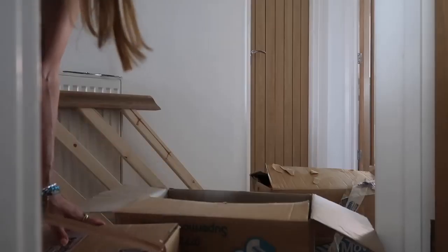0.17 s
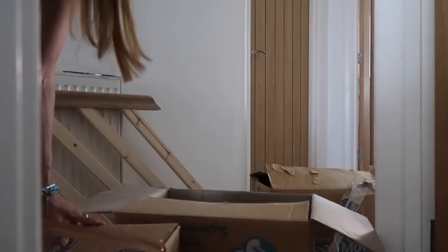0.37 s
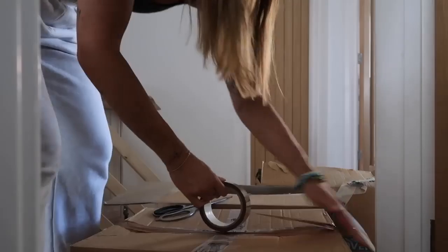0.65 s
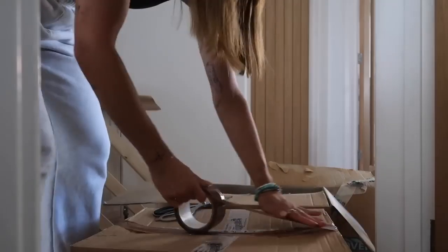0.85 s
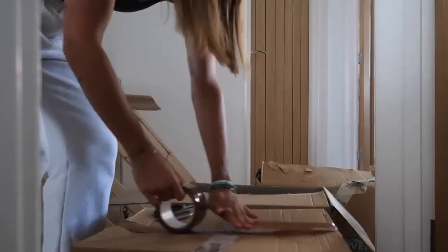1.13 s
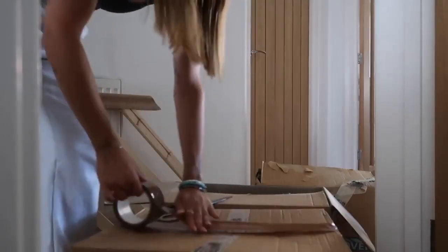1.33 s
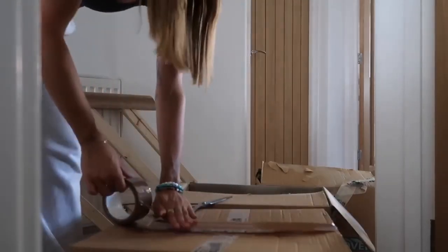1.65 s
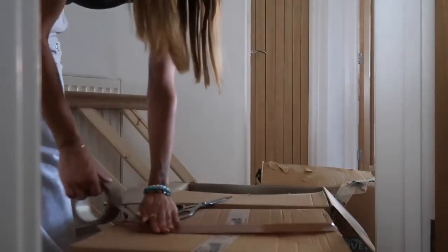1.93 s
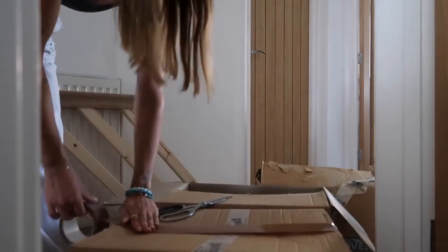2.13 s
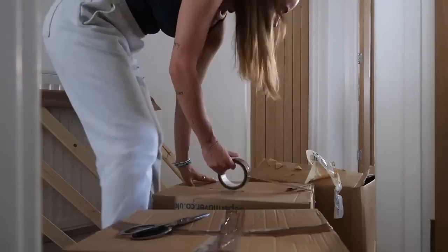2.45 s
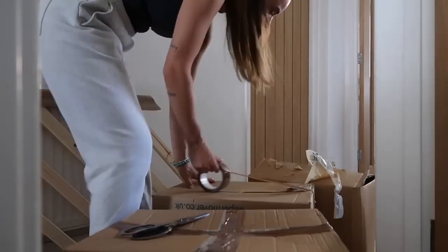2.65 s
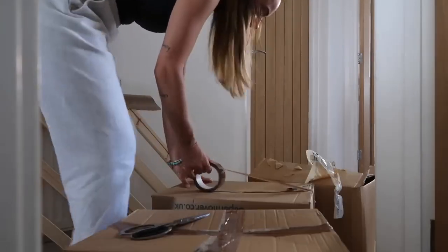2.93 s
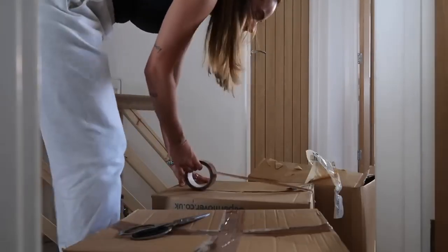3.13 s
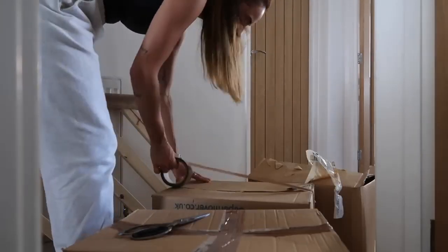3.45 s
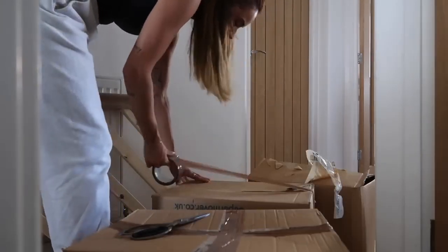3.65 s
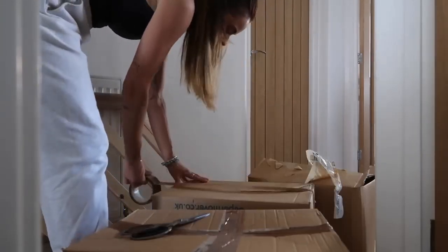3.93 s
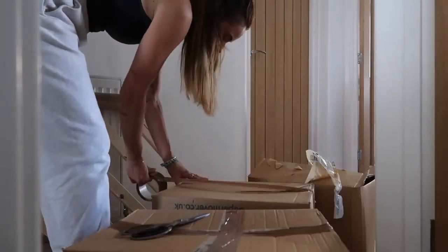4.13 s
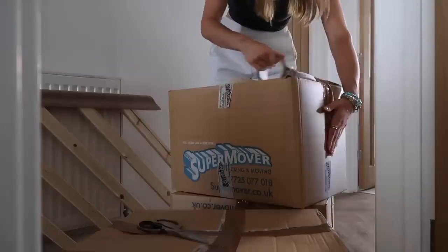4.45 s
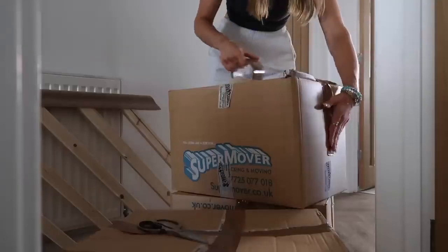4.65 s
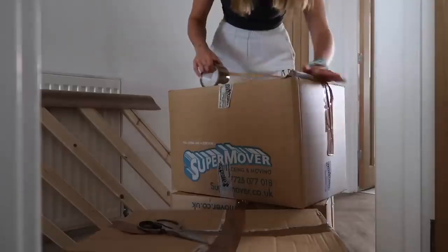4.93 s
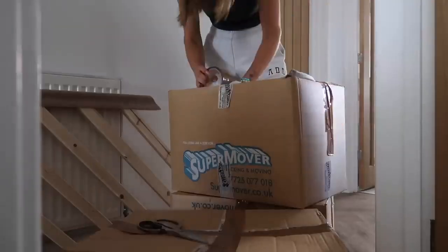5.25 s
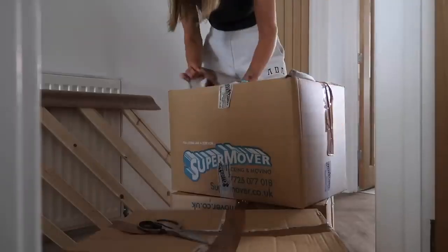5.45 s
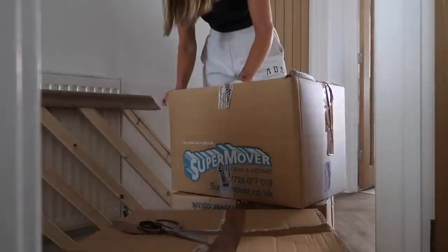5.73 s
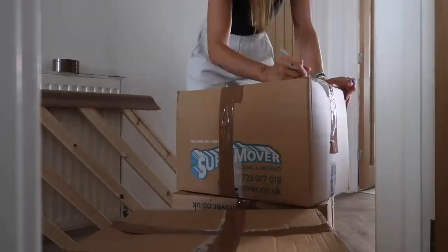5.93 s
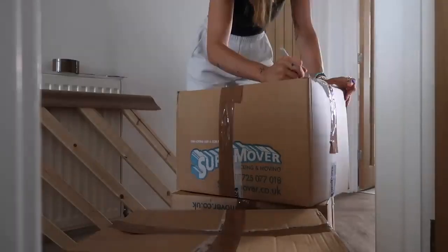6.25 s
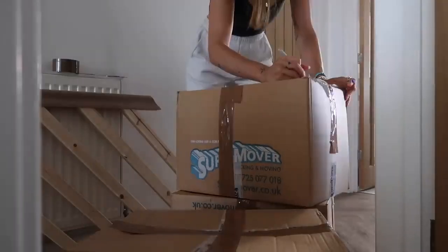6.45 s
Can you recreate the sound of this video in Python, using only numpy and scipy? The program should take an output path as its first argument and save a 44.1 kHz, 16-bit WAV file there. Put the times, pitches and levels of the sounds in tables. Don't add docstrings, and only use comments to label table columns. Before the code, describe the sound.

Close up in a bare, echoing hallway, packing tape tears off its roll in rough, uneven rasps. Sharp snaps and short squealing twangs stand out, and hollow cardboard resonates underneath. The pulls come in groups with abrupt cuts between boxes and small rustles of hands. A last fast ripping burst ends, leaving faint rubs and taps on cardboard over a very soft room hush.

```python
import sys
import numpy as np
from scipy import signal
from scipy.fft import rfft, irfft
from scipy.io import wavfile
from scipy.ndimage import uniform_filter1d

SR = 44100
rng = np.random.default_rng(int(sys.argv[2]) if len(sys.argv) > 2 else 0)


def file_out(sig):
    cols = np.atleast_2d(sig).T
    lim = np.clip(cols, -1, 1)
    pcm = np.round(lim * 32767).astype(np.int16)
    wavfile.write(sys.argv[1], SR, pcm)


def voltage_ratio(decibels):
    exponent = np.asarray(decibels, float) / 20
    return 10 ** exponent


N = 290178

RELEASE_S = 0.05
BOX_AIR_HZ = 90.9

GRIP_STARTS = [
    .7,
    2.455,
    4.275,
    5.3,
]
TAPE_FACING = [-1, 1, -1, -1, 1]
# first_tug_s, slips_per_s, slip_drift_per_s2, panel_hz, panel_drift_hz_per_s
GRIP_MOTION = [
    (0.0, 192, 119.5, 388, 1),
    (.853, 249, -60.5, 320, 137),
    (2.641, 190, -50, 360, 108),
    (4.428, 180, 15, 577, -82),
    (5.378, 156, 450.5, 550, 100),
]
# box_air_over_panel_db, fizz_over_rasp_db, panel_into_hall_db (added to
GRIP_LEVELS = [(-22, -10, -1.5), (-24.5, -10, -4.5), (-13.5, -10, 0), (-16.5, -13.5, 0), (-39, -12.5, 0)]
# start_s, hold_s, first_effort_db, last_effort_db, panel_over_rasp_db
PULLS = [(0.0, 0.17, -21, -24, -7), (0.2, 0.38, -20, -22.5, -8.5), (0.85, 0.09, -15, -19.5, 0),
         (0.968, 0.0075, -23, -29, 3), (1.106, 0.029, -16.5, -18.5, -2),
         (1.177, 0.016, -20, -15.5, 0.5), (1.227, 0.12, -19, -17.5, -2.5),
         (1.346, 0.078, -20, -16.5, 0.5), (1.466, 0.018, -16.5, -19, 0),
         (1.5318, 0.017, -20, -21, 4.5), (1.583, 0.0035, -11.5, -27, 5.5),
         (1.776, 0.0076, -13, -21.5, 1.5), (1.8118, 0.039, -20, -20, 5.5),
         (1.901, 0.018, -14, -28.5, 6.5), (1.9491, 0.15, -18.5, -18.5, -1.5),
         (2.085, 0.024, -20, -21.5, -15),
         (2.6409, 0.16, -15, -19.5, -8), (3.012, 0.039, -20, -17, -9), (3.088, 0.058, -21, -18.5, -7),
               (3.318, .18, -15.5, -20, -6.5), (3.554, 0.04, -21.5, -25.5, -10.5),
               (3.661, 0.043, -23, -26, -7.5), (3.7246, 0.059, -21.5, -20, -5),
               (3.811, 0.055, -21.5, -22, -6.5), (3.881, 0.1, -19, -24.5, -7),
               (3.957, 0.055, -24, -23, -3.5), (4.022, 0.066, -28.5, -28, -1.5),
               (4.426, 0.068, -12, -19, -13.5), (4.498, .11, -15.5, -19, -15.5),
               (4.623, 0.096, -21, -22.5, -2), (4.737, 0.2, -22, -22, -3.5),
               (4.945, 0.11, -22.5, -25.5, -2.5), (5.378, 0.027, -17.5, -19.5, -8),
               (5.428, 0.1, -21.5, -15, -9.5), (5.524, 0.23, -16, -20, -7.5)]


def pull(start, hold, first_effort_db, last_effort_db, panel_db):
    t = np.arange(start, start + hold + RELEASE_S + 0.036, 1 / SR)
    grip = np.searchsorted(GRIP_STARTS, start)
    face = TAPE_FACING[grip]
    air_db, fizz_db, panel_far_db = GRIP_LEVELS[grip]
    since, rate, rate_drift, panel_hz, panel_drift = GRIP_MOTION[grip]
    rate = rate + rate_drift * (t - since)
    panel_hz = panel_hz + panel_drift * (t - since)
    effort_db = hand_effort(t, start, hold, first_effort_db, last_effort_db)
    full_db = max(first_effort_db, last_effort_db)
    weaker_db = np.minimum(effort_db - full_db, 0)

    wander, tear, size = rng.standard_normal((len(t), 3)).T
    slips, common, dip = make_room(t, slip_train(rate, wander, size), full_db)
    puffs = tearing_puffs(slips, tear, size)
    live = t <= start + hold + RELEASE_S
    drive = (0.31 * face * evened(slips) + 0.69 * puffs) * live
    air, panel, tape, _ = bands(coloured(drive, body(grip)), [170, 800, 5500])
    fizz = bands(coloured((0.11 * drive + puffs) * live, body(grip)), [5500])[1]

    close = voltage_ratio(panel_db - 16.5) * panel + ringing_tape_and_panels(t, start, start + hold, tape + panel)
    close = close + face * bare_clicks(common * (t > start), rate, grip) * live
    panel = evened(0.915 * panel + 0.085 * resonate(panel, panel_hz, 150.0))
    air = evened(0.72 * air + 0.28 * resonate(air, BOX_AIR_HZ + 0 * t, 16.0))
    rasp = voltage_ratio(effort_db) * tape
    rasp = rasp + voltage_ratio(full_db + panel_db + panel_far_db + weaker_db) * panel
    rasp = rasp + voltage_ratio(full_db + air_db + panel_db + weaker_db) * air
    fizz_swell = np.minimum(0.49 + (t - start) / 0.057, 1)
    rasp = rasp + voltage_ratio(full_db + fizz_db + 0.85 * weaker_db) * fizz * fizz_swell
    fade_out = np.clip((t[-1] - t) / 0.022, 0, 1)
    return start, np.array([rasp, voltage_ratio(effort_db) * close]) * dip * fade_out


def hand_effort(t, start, hold, first_db, last_db):
    held_db = np.interp(t, [start, start + hold], [first_db, last_db])
    release_db = -420 * np.clip(t - start - hold, 0, RELEASE_S)
    jerk_db = 4.0 * np.exp(-(t - start) / 0.004)
    return held_db + release_db + jerk_db


def slip_train(rate, wander, size, jitter=0.35, spread_db=3.0):
    unevenness = np.exp(jitter * evened(uniform_filter1d(wander, 120)))
    turns = np.cumsum(np.clip(rate, 60, 1500) * unevenness) / SR
    slips = np.diff(np.floor(turns), prepend=-1) * voltage_ratio(spread_db * size)
    slips[0] = 1
    return slips


def make_room(t, slips, full_db):
    common, dip = slips.copy(), np.ones(len(t))
    for at, db, _ in HARD_SLIPS:
        if not t[0] - 0.003 < at < t[-1]:
            continue
        dip *= 1 - 0.85 * np.exp(-0.5 * ((t - at) / 0.00025) ** 2)
        near = abs(t - at) < 0.0025
        slips[near], common[near] = 0, 0
        slips[abs(t - at + 3 / SR) < 0.5 / SR] = voltage_ratio(db - 8 - full_db)
    return slips, common, dip


def tearing_puffs(slips, tear, size, tear_s=0.0058):
    clumps = voltage_ratio(0.93 * evened(uniform_filter1d(size, 500)))
    dying = signal.lfilter([1], [1, -np.exp(-1 / (tear_s * SR))], slips)
    return evened(clumps * (1.2 + dying) * tear)


# start_s, length_s, pitch_hz, level_over_rasp_db
TWANGS = [(0.218, 0.29, 1980, -14), (0.366, 0.29, 3660, -6), (0.854, 0.057, 2060, -2.5),
          (0.855, 0.15, 1120, -2), (0.865, 0.13, 280, -7.5), (1.813, 0.031, 2000, -4),
          (1.949, 0.068, 2240, -5), (2.048, 0.17, 3000, -1.5), (2.057, 0.1, 1850, -8),
          (1.777, 0.01, 2030, 3), (1.773, 0.0092, 1180, -7), (3.334, 0.093, 294, -9.5),
          (3.023, 0.028, 1540, -8), (2.646, 0.05, 2020, -14), (0.0, 0.16, 2540, -4), (0.912, 0.036, 336, 1),
          (1.271, 0.14, 292, -6.5), (1.278, 0.063, 970, -7.5), (1.324, 0.044, 1870, -19),
          (1.535, 0.046, 575, -6), (2.756, 0.038, 3330, -11), (2.78, 0.029, 980, -4.5),
          (3.325, 0.15, 1540, -11), (4.622, 0.17, 1250, -8), (4.979, 0.049, 2350, -3),
          (5.449, 0.068, 4500, -4.5), (5.56, 0.084, 3070, -10), (2.641, 0.095, 1560, -6.5),
          (2.642, 0.087, 310, -4), (3.104, 0.032, 960, 0), (3.323, 0.13, 896, -3.5),
          (3.725, 0.035, 1000, -1), (3.747, .034, 2320, -8), (3.81, 0.052, 2090, -2.5),
          (3.82, 0.037, 845, -5), (3.896, 0.071, 2350, -3), (3.956, 0.091, 840, -10),
          (3.97, 0.13, 1800, -4), (4.427, 0.052, 1930, -9), (4.431, 0.068, 540, -2),
          (4.467, 0.018, 2420, 3), (4.486, 0.06, 1070, -1.5), (4.547, 0.061, 563, -3),
          (4.631, 0.031, 1860, 5.5), (5.499, 0.043, 3000, -10), (5.433, 0.057, 560, -12),
          (5.536, 0.046, 570, -15), (5.66, 0.022, 2400, -4), (5.68, 0.039, 1930, -7),
          (5.68, 0.042, 3100, -8), (5.608, 0.031, 574, -9), (5.6, .035, 2700, -16), (2.039, 0.066, 777, -4),
          (5.684, 0.047, 585, -5),
          (5.435, 0.05, 564, -7.5), (5.538, 0.044, 576, -10), (5.599, 0.033, 574, -5),
               (5.6, .035, 2700, -12), (5.662, 0.02, 2400, -5), (5.676, 0.065, 590, -9),
               (5.688, .045, 1900, -8), (5.693, .045, 3100, -10)]


def ringing_tape_and_panels(t, start, end, shaking):
    sung = 0
    for onset, length, hz, db in TWANGS:
        if onset < end and onset + length > start:
            swell = np.clip(np.minimum(t - onset, onset + length - t) / 0.0046, 0, 1)
            width_hz = 86 * (hz / 1000) ** 1.4
            sung = sung + voltage_ratio(db) * swell * steadied(resonate(shaking, hz + 0 * t, width_hz))
    return sung


CLICK_LEVELS = [-6, -12, -11, -13, -8]


def bare_clicks(slips, rate, grip):
    pulse = np.exp(-0.5 * (np.arange(-6, 7) / 2.2) ** 2)
    pulses = np.convolve(slips, pulse)[4:len(slips) + 4]
    clicks = signal.lfilter([1, -1], [1, -0.89], pulses)
    return voltage_ratio(CLICK_LEVELS[grip]) * evened(clicks) * (220 / rate) ** 0.22


# pitch_hz, level_db
BOX_COLOURS = [
    [(24, -37), (40, -1), (204, 1), (467, -3), (1680, -18.5), (2000, -11), (9500, -29.5), (11000, -32),
     (14500, -46)],
    [(24, -67), (40, -12), (85, -1), (130, -5), (320, -10.5), (479, -10), (2100, -2), (12100, -21.5),
     (16000, -28.5)],
    [(24, -48), (40, -2), (81, -7), (159, -8), (290, -2), (491, -7), (852, 0), (1090, -4), (3140, -5.5),
     (12800, -21), (16000, -30)],
    [(24, -78), (40, -57), (85, -6), (180, -16), (630, -6.5), (918, -12), (1090, -6.5), (12800, -20.5),
     (16000, -25)],
    [(24, -45), (40, -56), (283, -14), (320, -12), (570, -5.5), (873, -10), (2440, -8), (12800, -21.5),
     (16000, -28)],
]
# pitch_hz, width_hz, level_db
BOX_RINGS = [
    [(1980, 55, -13), (2350, 70, -37), (3200, 160, -4)],
    [(324, 13, 11), (1070, 79, -6), (2060, 11, -34)],
    [(320, 130, -27)],
    [(660, 70, -12)],
    [(553, 120, -3), (1860, 66, -8), (2670, 46, -41)],
]


def body(grip, ring_db=6.5):
    def gain_at(hz):
        ring = 0
        for f, width, db in BOX_RINGS[grip]:
            ring = ring + voltage_ratio(0.35 * db) / (1 + (2 * (hz - f) / width) ** 2)
        return voltage_ratio(read(BOX_COLOURS[grip], hz) + ring_db * ring)
    return gain_at


# time_s, peak_db,
# tape_face [+1 or -1]
SNAPS = [(0.0036, -8, -1), (0.0148, -7, -1), (0.0792, -8, -1), (0.1033, -9, 1), (0.1692, -11, 1),
         (0.2036, -9, -1), (0.2132, -6, -1), (0.2179, -6, -1), (0.2386, -6, -1), (0.2452, -6, -1),
         (0.2547, -7, -1), (0.2617, -9, -1), (0.2756, -9, -1), (0.28, -9, -1), (0.2902, -9, -1),
         (0.2947, -8, -1), (0.3376, -7, -1), (0.352, -5, -1), (0.3637, -8, -1), (0.3755, -6, -1),
         (0.3806, -6, -1), (0.3861, -6, -1), (0.4204, -5, -1), (0.4253, -6, -1), (0.4377, -7, -1),
         (0.4573, -7, -1), (0.4661, -4, -1), (0.4702, -4, -1), (0.5407, -8, -1), (0.5515, -9, -1),
         (0.578, -10, -1), (0.9092, -3, 1), (0.9371, -3, 1), (0.9395, -3, -1), (0.9697, -8, -1),
         (1.242, -6, 1), (1.3022, -6, 1), (1.4906, -7, 1), (1.5318, -9, -1), (1.585, -9, -1),
         (1.7766, -4, -1), (1.7793, -6, 1), (1.8124, -6, 1), (1.9018, -7, -1), (1.951, -3, 1),
         (1.959, -4, -1), (1.9776, -5, -1), (2.0212, -6, 1), (2.0917, -4, -1), (2.1171, -5, 1),
         (2.6627, -3, -1), (2.6807, -3, 1), (2.6995, -4, -1), (2.7922, -5, 1), (3.0128, -7, -1),
               (3.0262, -6, 1), (3.0925, -9, -1), (3.0986, -7, -1), (3.3187, -6, -1), (3.3351, -4, -1),
               (3.3421, -4, -1), (3.4308, -4, -1), (3.4461, -4, -1), (3.455, -4, 1), (3.46, -4, 1),
               (3.6774, -12, -1), (3.7246, -10, -1), (3.7398, -6, -1), (3.7497, -4, -1), (3.7599, -4, -1),
               (3.8115, -7, -1), (3.8803, -10, 1), (3.8933, -7, -1), (3.9652, -7, -1), (4.0204, -9, -1),
               (4.0326, -4, -1), (4.0463, -5, -1), (4.4281, -6, -1), (4.4559, -3, -1), (4.4615, -3, -1),
               (4.7385, -8, -1), (4.7434, -8, -1), (4.7842, -7, 1), (4.9627, -10, -1), (5.3816, -7, 1),
               (5.3854, -5, 1), (5.3906, -4, 1), (5.3979, -7, 1), (5.4026, -6, 1), (5.4339, -2, 1),
               (5.4479, -5, 1), (5.4516, -3, 1), (5.4552, -4, 1), (5.4588, -3, 1), (5.4665, -5, 1),
               (5.4701, -5, 1), (5.5246, -4, -1), (5.5496, -3, 1), (5.5567, -4, 1), (5.6994, -4, -1),
         (1.1088, -10, -1), (1.2271, -10, -1), (1.2888, -7, 1), (1.313, -7, -1), (1.8244, -5, -1),
                (1.8402, -6, -1), (1.8487, -6, -1), (2.6412, -9, -1), (2.7101, -4, 1), (2.7726, -7, -1),
                (2.8252, -13, 1), (3.0191, -8, -1), (3.1029, -7, -1), (3.1388, -8, 1), (3.1813, -15, -1),
                (3.3997, -7, -1), (3.4772, -8, -1), (3.4838, -8, -1), (3.4888, -9, -1), (3.5046, -11, 1),
                (3.5559, -14, 1), (3.5752, -12, 1), (3.5859, -12, -1), (3.6627, -14, -1), (3.688, -16, -1),
                (3.8425, -7, -1), (3.9174, -8, 1), (3.9332, -10, -1), (3.9775, -8, -1), (4.0572, -10, 1),
                (4.6635, -6, 1), (4.7125, -10, 1), (4.7555, -10, 1), (4.9493, -12, 1), (4.9953, -10, -1),
                (5.0365, -13, 1), (5.4804, -7, 1), (5.5831, -7, 1), (5.7627, -14, 1)]
HARD_SLIPS = SNAPS
SNAP_RINGS = [-14, -8, -8, -10, -24]


def snap(at, db, face, ring_hz=2070.0, ring_s=0.0016):
    n = np.arange(-8, 300)
    ring_db = SNAP_RINGS[np.searchsorted(GRIP_STARTS, at)]
    hz = ring_hz * rng.uniform(0.733, 1.273)
    ring = voltage_ratio(ring_db) * np.cos(2 * np.pi * hz * n / SR) * np.exp(-n / SR / ring_s) * (n > 10)
    pulse = np.exp(-0.5 * (n / 2.2) ** 2)
    rebound = -0.4 * np.exp(-0.5 * ((n - 6.5) / 2.2) ** 2)
    return max(at - 8 / SR, 0), np.sign(face) * voltage_ratio(db + 1.2) * (pulse + rebound + ring)


# middle_s, length_s, peak_db
BOOMS = [(0.03, 0.057, -26), (0.208, .08, -32), (0.877, .06, -32), (0.995, 0.089, -31.5),
         (1.184, 0.068, -32), (1.425, .08, -29), (1.511, .12, -29), (1.615, .09, -34), (1.79, 0.029, -26),
         (1.849, 0.05, -15.5), (1.943, 0.065, -20.5), (2.037, 0.071, -27), (2.653, 0.063, -33),
         (2.813, .1, -29), (3.034, .09, -32), (3.147, .1, -27), (3.396, 0.21, -21), (3.604, 0.118, -32),
         (3.782, 0.09, -21), (3.922, .1, -28), (4.069, 0.18, -32), (4.807, 0.073, -35), (4.909, .09, -31),
         (5.033, 0.24, -26), (5.418, .09, -31.5), (5.768, 0.086, -39), (6.144, 0.078, -46)]


def boom(middle, length, db, spread=0.048):
    t = np.arange(0, length, 1 / SR)
    detune, phase = rng.uniform(-1, 1, 2)
    tone = np.sin(2 * np.pi * BOX_AIR_HZ * (1 + spread * detune) * t + np.pi * phase)
    return max(middle - length / 2, 0), voltage_ratio(db) * tone * np.sin(np.pi * t / length) ** 2


# start_s, length_s, first_rustle_db, last_rustle_db, low_rub_over_rustle_db
HAND_STROKES = [(0.769, 0.027, -43, -54, -14), (0.797, 0.044, -38.5, -42, 2), (2.476, 0.068, -47, -56, 7),
                (2.523, 0.14, -59, -39, -15), (4.275, 0.064, -38, -43.5, -7), (4.353, 0.07, -42, -43, -7),
                (5.272, 0.1, -34, -37, -10.5), (5.347, 0.03, -35, -44, -10), (6.026, 0.047, -42.5, -36, -5),
                (6.07, 0.097, -35, -41.5, -3), (6.174, 0.21, -84, -66, 17),
                (6.345, 0.057, -50.5, -43.5, -12), (6.398, 0.061, -44, -42, -12),
                (6.466, 0.056, -44, -39.5, -2), (6.522, 0.022, -44, -57, -7), (6.55, 0.029, -50, -37, -8)]
# pitch_hz, level_db
RUB_COLOUR = [(24, -21), (40, 12), (237, -1.5), (312, -8), (354, -1), (433, -12.5), (1150, -27.5),
              (2700, -24), (13100, -44), (16000, -46)]


def hands(start, length, first_db, last_db, low_db, grain_db=6.5, grains_per_s=1500):
    t = np.arange(0, length, 1 / SR)
    grains = (rng.random(len(t)) < grains_per_s / SR) * voltage_ratio(grain_db * rng.exponential(1, len(t)))
    drive = (4.0 + evened(grains)) * rng.standard_normal(len(t))
    low, rustle = bands(coloured(drive, lambda hz: voltage_ratio(read(RUB_COLOUR, hz))), [700])
    level_db = first_db + (last_db - first_db) * t / length
    stroke = voltage_ratio(level_db) * signal.windows.tukey(len(t), 0.04)
    return start, stroke * (rustle + voltage_ratio(low_db) * low)


# time_s, peak_db, pitch_hz
FINGER_TICKS = [(0.771, -42, 2500), (0.797, -30.5, 280), (.798, -36, 2200), (2.462, -39, 3420),
                (2.463, -43, 4800), (2.463, -43, 1900), (2.476, -34, 125), (2.48, -34, 247),
                (2.492, -37, 230), (2.579, -36, 1700), (4.376, -30, 2300), (5.279, -27, 2000),
                (5.287, -25, 1500), (5.324, -24, 4800), (5.33, -30, 3500), (6.023, -39, 1140),
                (6.067, -31, 239), (6.088, -36, 340), (6.104, -36, 260), (6.122, -33, 226), (6.14, -40, 66),
                (6.143, -36, 370), (6.144, -37, 600), (6.16, -40, 70), (6.313, -39, 209), (6.47, -42, 160),
                (6.501, -44, 98)]


def tick(at, db, hz, crack=0.073):
    t = np.arange(2000) / SR
    cycles = 4.9 if hz > 700 else 1.8
    ring = np.sin(2 * np.pi * hz * t) * np.exp(-t * hz / cycles)
    crackle = crack * rng.standard_normal(len(t)) * np.exp(-t / 0.0006)
    return at, voltage_ratio(db + 4.5) * (ring + crackle)


# pitch_hz, time_to_fall_60_db_s
HALL_RING = [(100, 0.35), (260, 0.62), (700, 0.51), (1840, 0.62), (4850, 0.59), (12000, 0.34)]
SCENE_CHANGES = [0.689, 2.455, 4.276, 5.967]


def hall(x, early_db=18.5, early_s=0.0062, turns_per_s=3.0):
    taps = np.zeros((6, 21000))
    at = np.arange(160, 20980, 20) + rng.integers(0, 20, (6, 1041))
    np.put_along_axis(taps, at, rng.choice([-1., 1.], at.shape), 1)
    hz, t, z = signal.stft(taps, SR, nperseg=256)
    fade_db = -60 * t / read(HALL_RING, hz)[:, None]
    early_boost_db = early_db * np.exp(-t / early_s)
    tails = signal.istft(z * voltage_ratio(fade_db + early_boost_db), SR, nperseg=256)[1]
    tails = tails.reshape(2, 3, -1) / np.linalg.norm(tails[0])
    now = np.arange(N) / SR
    feeds = x * np.sqrt(2 / 3) * np.cos(np.pi * (turns_per_s * now + np.arange(3)[:, None] / 3))
    wet = np.zeros((2, N))
    for start, end in zip([0, *SCENE_CHANGES], [*SCENE_CHANGES, N / SR]):
        part = slice(round(start * SR), round(end * SR))
        heard = signal.fftconvolve(feeds[None, :, part], tails, axes=2).sum(1)
        fade = np.clip((end - now[part]) / 0.0093 + (end == N / SR), 0, 1)
        wet[:, part] = heard[:, :len(now[part])] * fade
    return wet


# pitch_hz, level_db
HUSH_COLOUR = [(18, -31), (30, 4), (336, 1.5), (684, -5), (2120, -11), (9710, -28), (13000, -26),
               (16000, -50)]


def hush():
    noises = rng.standard_normal((2, N))
    return [voltage_ratio(-54.5) * evened(coloured(n, lambda hz: voltage_ratio(read(HUSH_COLOUR, hz)))) for n in noises]


# pitch_hz, side_minus_middle_db
STEREO_WIDTH = [(60, -44), (200, -37), (700, -24), (1300, -23.5), (2400, -23), (4400, -2), (7000, 1.5),
                (10000, 6), (13000, 7.5), (16000, 0)]


def side_sound(mid, dry, wet_side, hush_side):
    scatter = rng.standard_normal((3, 400)) * np.exp(-np.arange(400) / 39.0)
    feeds = dry * np.cos(np.pi * (5.5 * np.arange(N) / SR + np.arange(3)[:, None] / 3))
    near = signal.oaconvolve(feeds, scatter / np.linalg.norm(scatter[0]), axes=1).sum(0)[:N]
    apart = 0.062 * signal.hilbert(mid).imag + 0.45 * near + 0.35 * wet_side + hush_side
    side = irfft(rfft(apart) * voltage_ratio(read(STEREO_WIDTH, np.fft.rfftfreq(N, 1 / SR))), N)
    return side + voltage_ratio(-4.0) * coloured(hush_side, lambda hz: hz ** 2 / (hz ** 2 + 150 ** 2))


def evened(x):
    return x / np.sqrt(np.mean(x ** 2) + 1e-20)


def steadied(x, share=0.59, span=500):
    return evened(x / (uniform_filter1d(x ** 2, round(span)) + 0.05) ** (share / 2))


def resonate(x, hz, width):
    turn = np.exp(2j * np.pi * np.cumsum(hz) / SR)
    r = np.exp(-np.pi * width / SR)
    return evened((turn * signal.lfilter([1 - r], [1, -r], x / turn)).real)


def read(points, hz):
    f, value = np.transpose(points)
    return np.interp(np.log(hz + 1), np.log(f + 1), value)


def coloured(x, gain_at):
    log_gain = np.log(np.maximum(gain_at(abs(np.fft.fftfreq(8192, 1 / SR))), 1e-5))
    taps = np.fft.ifft(np.exp(np.conj(signal.hilbert(log_gain)))).real[:4096]
    return signal.oaconvolve(x, taps)[:len(x)]


def bands(x, edges_hz):
    parts = []
    for pair in zip([20, *edges_hz], [*edges_hz, 20000]):
        sos = signal.butter(3, pair, "band", fs=SR, output="sos")
        parts.append(evened(signal.sosfilt(sos, x)))
    return parts


def add(mix, s, sound):
    part = mix[round(s * SR):][:len(sound)]
    part += sound[:len(part)]


def scene():
    dry, close, snaps = np.zeros((3, N))
    for row in PULLS:
        start, (rasp, close_part) = pull(*row)
        add(dry, start, rasp)
        add(close, start, close_part)
    for row in HARD_SLIPS:
        add(snaps, *snap(*row))
    for row in BOOMS:
        add(close, *boom(*row))
    for row in HAND_STROKES:
        add(dry, *hands(*row))
    for row in FINGER_TICKS:
        add(dry, *tick(*row))
    wet = hall(dry)
    air = hush()
    mid = voltage_ratio(-3.0) * dry + voltage_ratio(-5.5) * wet[0] + voltage_ratio(-2.0) * close + snaps + air[0]
    side = side_sound(mid, dry, wet[1], air[1])
    return np.array([mid + side, mid - side])


def band_limit(x):
    return signal.sosfilt(signal.butter(12, 16300, fs=SR, output="sos"), x)


def record(dry):
    thin = signal.sosfilt(signal.butter(2, 45, "high", fs=SR, output="sos"), dry)
    limited = 1.2 * np.tanh(thin / 1.4)
    treble_limit = signal.firwin(63, 15800, fs=SR)[None]
    mix = signal.oaconvolve(limited, treble_limit, "same")
    return band_limit(mix)


dry = scene()
out = record(dry)
file_out(out)
```